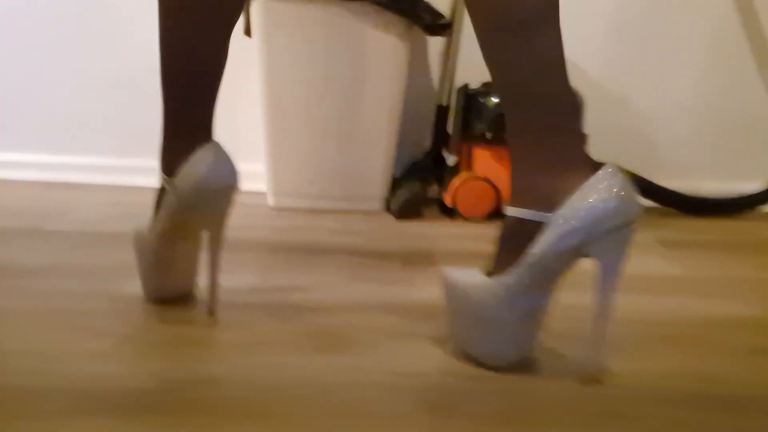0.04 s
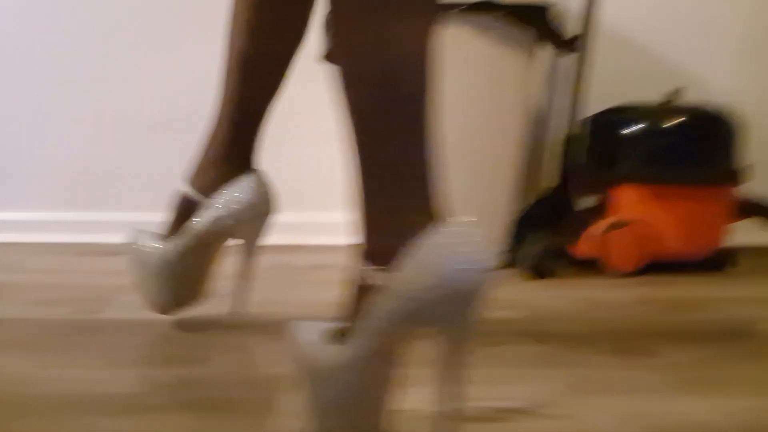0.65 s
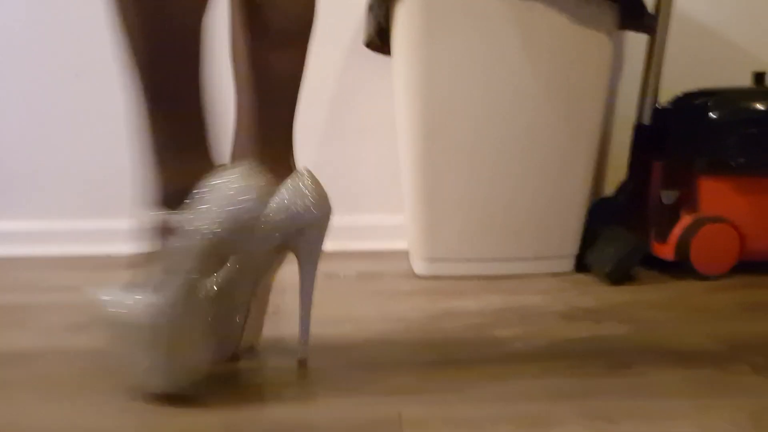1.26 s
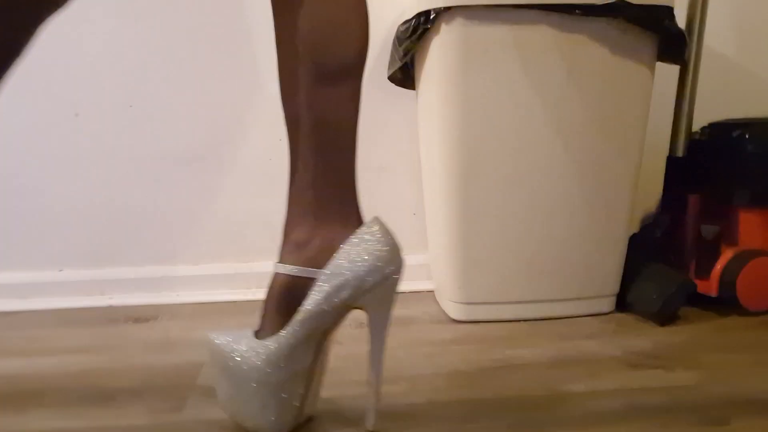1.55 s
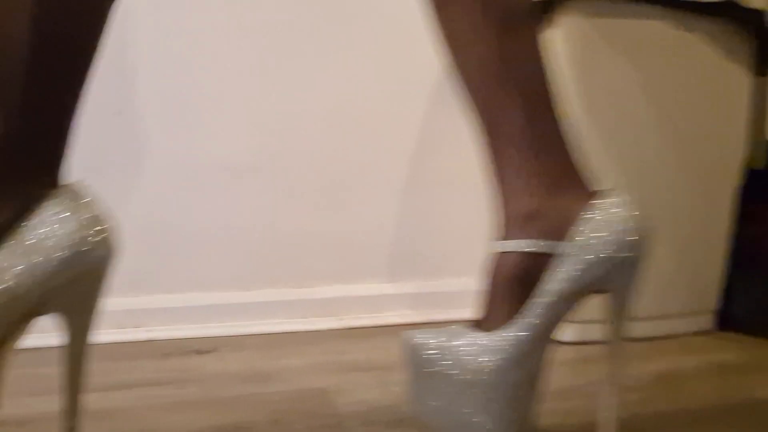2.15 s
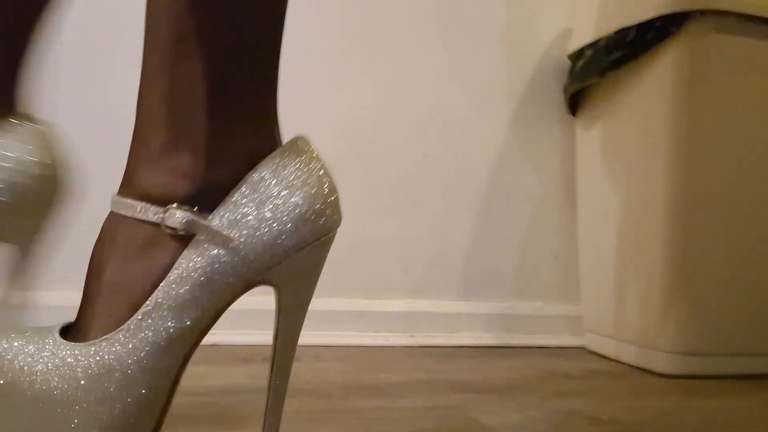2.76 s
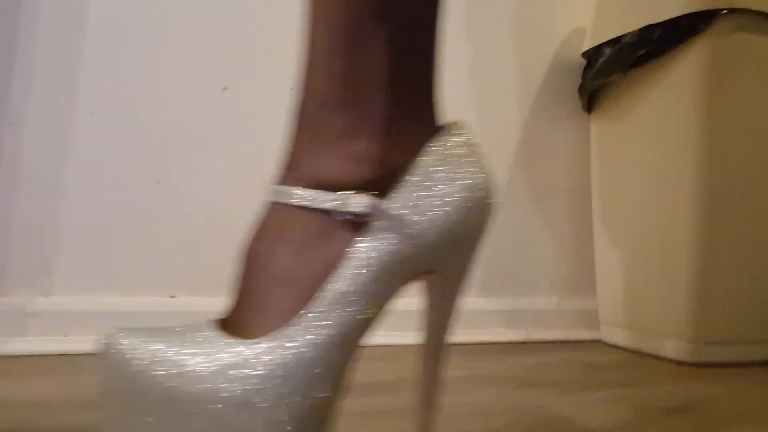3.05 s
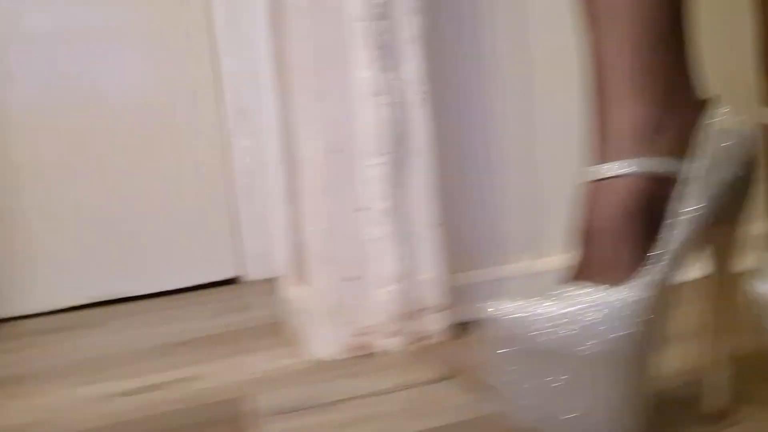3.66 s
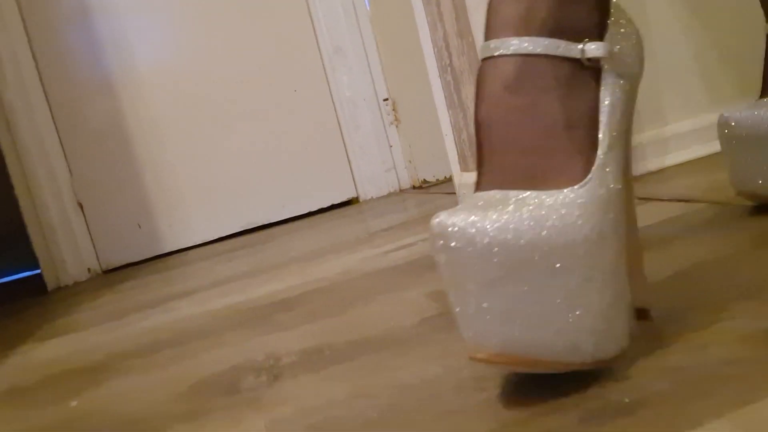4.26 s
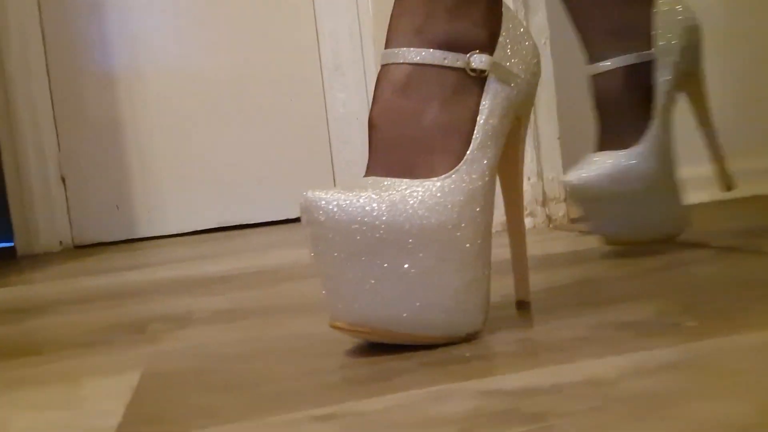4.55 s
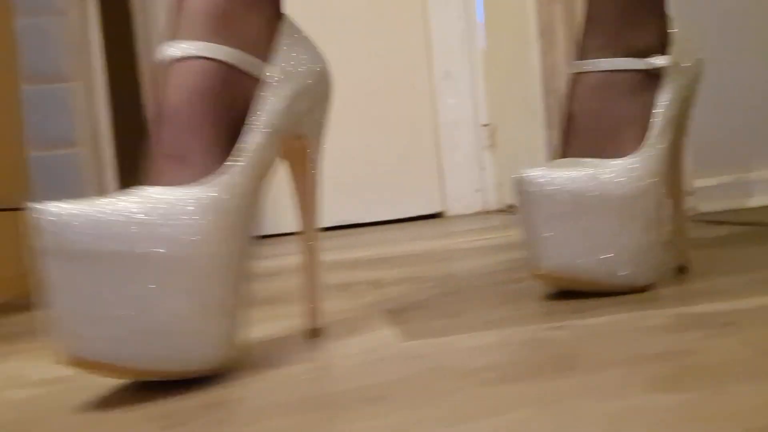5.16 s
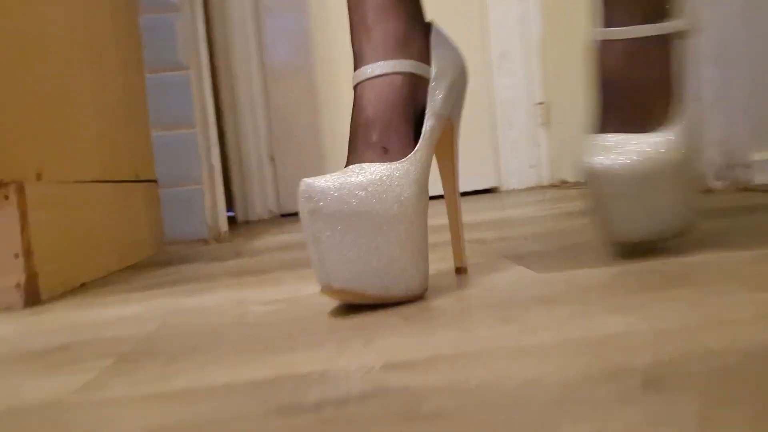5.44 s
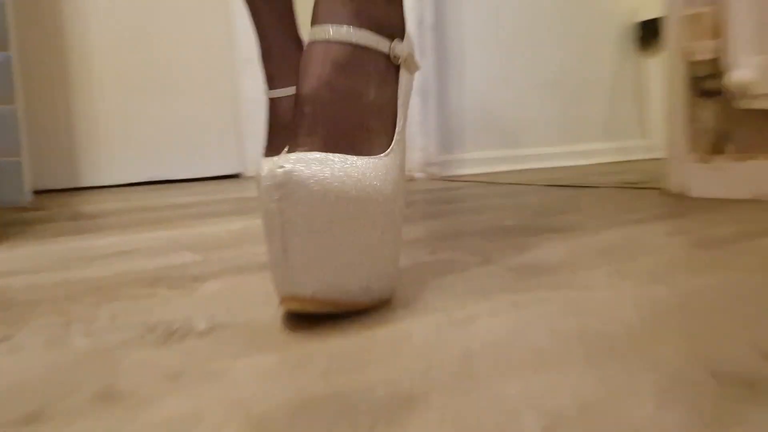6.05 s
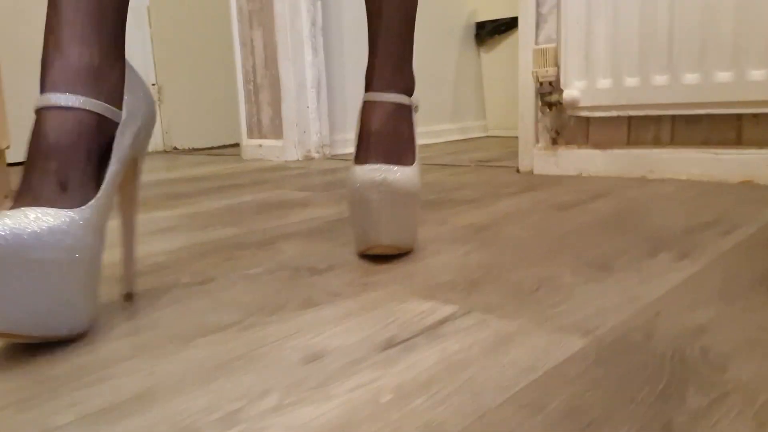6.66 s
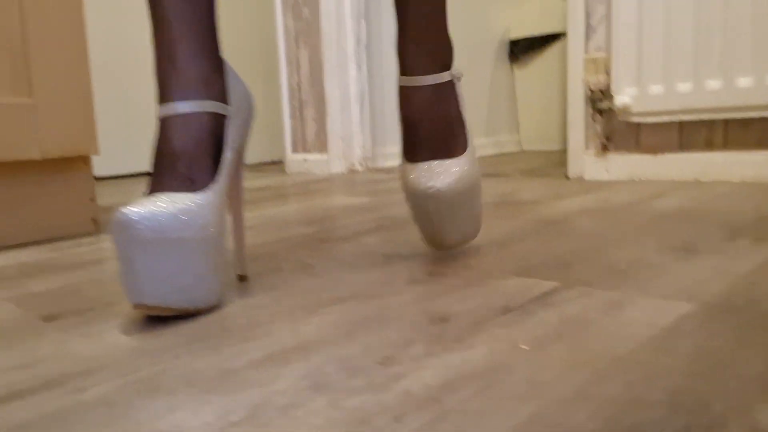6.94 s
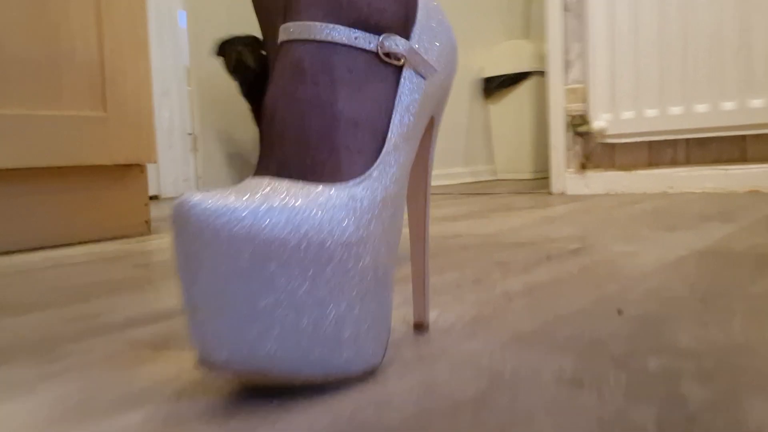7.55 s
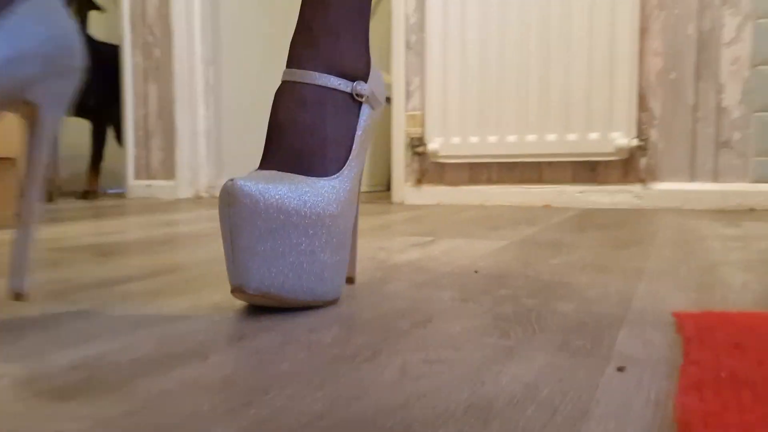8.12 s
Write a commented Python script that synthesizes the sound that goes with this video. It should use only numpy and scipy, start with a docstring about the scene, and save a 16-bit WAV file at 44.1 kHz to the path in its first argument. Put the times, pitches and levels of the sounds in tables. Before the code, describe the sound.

Slow steps in platform high heels clack and thud indoors, with soft scuffing and a sharp click as the shoes graze each other.

```python
"""A soft scuff and a sharp heel knock come first, over faint room air and the rumble of a low camera.
Glittery platform high heels go on stepping slowly over a laminate floor in a small room.
Heel tips and platforms knock on the planks and set the floor booming. Between steps, soles and
stockings scuff, straps squeak and buckles tap. Once the two glitter-coated shoes graze each other
with a sharp rasping click, and later a board creaks under a turning foot."""
import sys
import numpy as np
from scipy import signal
from scipy.fft import rfft, irfft
from scipy.io import wavfile
from scipy.ndimage import uniform_filter1d

SR = 44100
rng = np.random.default_rng(int(sys.argv[2]) if len(sys.argv) > 2 else 0)


def to_wav(s):
    """Save 16-bit WAV."""
    ch = np.atleast_2d(s).T  # columns
    pcm = np.round(np.clip(ch, -1, 1) * 32767)  # PCM
    wavfile.write(sys.argv[1], SR, pcm.astype(np.int16))


N = 365588


def amp(db):
    """Turns decibels into a number to multiply a sound by."""
    return 10 ** (np.asarray(db) / 20)


def read_curve(points, hz):
    """Joins a table's points with straight lines over log frequency and reads them at hz."""
    known_hz, values = np.transpose(points)
    return np.interp(np.log(hz + 1), np.log(known_hz), values)


def seconds(length):
    """The time of each sample, from zero to length."""
    return np.arange(int(length * SR)) / SR


def unit(x):
    """Scales a sound so that the energy of its channels averages one."""
    return x / np.sqrt(np.mean(np.sum(x ** 2, -1)) + 1e-20)


def add(mix, start, sound):
    """Lays a sound into the mix at a time in seconds."""
    part = mix[..., max(round(start * SR), 0):][..., :sound.shape[-1]]
    part += sound[..., :part.shape[-1]]


def colour(x, spectrum, size=2048):
    """Gives a sound the balance of lows and highs in a table, with no ringing ahead of it."""
    log_gain = np.log(amp(read_curve(spectrum, abs(np.fft.fftfreq(size, 1 / SR)))))
    response = np.exp(np.conj(signal.hilbert(log_gain)))
    kernel = unit(np.fft.ifft(response).real)
    return signal.oaconvolve(np.atleast_2d(x), kernel[None], axes=1)[:, :x.shape[-1]]


def ring(t, db, hz, t60, rise_cycles=0.38):
    """One struck note: it builds quickly, then fades by 60 dB in t60 seconds, its ring time."""
    return amp(db - 60 * t / t60) * np.sin(2 * np.pi * hz * t) * (1 - np.exp(-t * hz / rise_cycles))


def two_mics(x, delay):
    """One sound reaches two microphones, the right one later by delay seconds."""
    hz = np.fft.rfftfreq(len(x), 1 / SR)
    return irfft(rfft(x) * np.exp(1j * np.pi * hz * delay * np.array([[1], [-1]])), len(x))


def friction(strokes, spectrum, grains_per_s, spread_db):
    """Rubbing is many tiny slips. Each stroke is (time [s], swell [s], fade [s], level [dB])."""
    force = np.zeros(N)
    for start, swell, fade, db in strokes:
        t = seconds(swell + 7 * fade)
        add(force, start, amp(db) * np.minimum(t / swell, 1) * np.exp(-np.maximum(t - swell, 0) / fade))
    sizes = amp(spread_db * np.minimum(rng.exponential(1, N), 3)) * rng.choice([-1, 1], N)
    slips = unit(sizes * (rng.random(N) < grains_per_s / SR)) * np.sqrt(N)
    return colour(force * slips, spectrum)[0]


def by_chance(per_s, swell, fade, db, spread_db=11):
    """Rubbing strokes of uneven strength at random moments."""
    gaps, strengths = rng.random((128, 2)).T
    times = np.cumsum(.5 + gaps) / per_s
    levels = db + spread_db * (2 * strengths - 1)
    return [(start, swell, fade, level) for start, level in zip(times, levels) if start < N / SR]


# How long the room echoes: (frequency [Hz], ring time [s])
ROOM_RING = [(100, 0.65), (400, 0.53), (900, 0.61), (1800, 0.36), (3500, 0.4), (7000, 0.25), (14000, 0.2)]
# How alike the echo is on the left and right: (frequency [Hz], likeness [0 to 1])
ECHO_LIKENESS = [(60, 1), (250, 0.81), (500, 0.69), (1000, 0), (2000, 0), (16000, 0)]
def room(x, near_db=0.5, near_t60=0.16, gap_s=0.00092, size=24576):
    """Echoes from one spot: a quick cluster off floor and skirting, then the slower room."""
    t, hz = np.arange(size) / SR, np.fft.rfftfreq(size, 1 / SR)
    left, other = rfft(rng.standard_normal((2, size)) * (rng.random((2, size)) < .15))
    alike = read_curve(ECHO_LIKENESS, hz)
    pair = np.array([left, alike * left + np.sqrt(1 - alike ** 2) * other])
    centres, t60s = np.transpose(ROOM_RING)
    tail = 0
    for share, t60 in zip(np.eye(len(centres)), t60s):
        band = irfft(pair * read_curve(np.c_[centres, share], hz))
        tail = tail + band * (amp(-60 * t / t60) + amp(near_db - 60 * t / near_t60))
    return signal.fftconvolve(np.atleast_2d(x), unit(tail * (t > gap_s)), axes=1)


# The tone of the room air and of the camera's rumble: (frequency [Hz], level [dB])
AIR_TONE = [(12, -33.5), (20, -0.5), (74, -2.5), (168, -16.5), (367, -14), (446, -13), (802, -13.5),
            (1760, -20.5), (2140, -18), (4420, -29), (5530, -24.5), (8410, -31), (9670, -28.5),
            (16000, -39)]
RUMBLE_TONE = [(20, -6), (40, 1), (56, -2), (100, -3.5), (200, -14.5), (350, -7.5), (450, -24),
               (1200, -25.5), (3000, -47.5)]
# How the rumble rises and falls: (time [s], level [dB])
RUMBLE_LEVELS = [(0, -65.5), (.5, -72), (1.1, -62.5), (1.4, -77), (2, -75), (2.6, -70), (4.7, -63.5),
                 (5.7, -70), (7.3, -70.5), (8.29, -68)]
def air_and_rumble(air_db=-69, air_follow=0.65):
    """The carried camera rumbles, and the hush of the room air swells a little with it."""
    rumble_db = np.interp(np.arange(N) / SR, *np.transpose(RUMBLE_LEVELS))
    swell_db = air_follow * (rumble_db - rumble_db.mean())
    air = amp(air_db + swell_db) * colour(rng.standard_normal((3, N)), AIR_TONE, size=8192)
    rumble = amp(rumble_db + 0.5) * colour(rng.standard_normal((3, N)), RUMBLE_TONE, size=8192)
    # row 0 goes to both sides; the other two rows are left and right
    return 0.44 * air[0] + 0.94 * air[1:] + rumble[0] + 0.25 * rumble[1:]


# The tone of the high hiss and of the sole's low rub: (frequency [Hz], level [dB])
HISS_TONE = [(300, -33.5), (1500, -3), (3000, -2.5), (5600, 0.5), (7400, -1.5), (8400, -7), (9500, 0),
             (12000, -9.5), (16000, -11.5)]
RUB_TONE = [(150, -23), (500, -7), (900, 1.5), (1700, -0.5), (2600, -9), (5000, -24.5), (16000, -40.5)]
# A foot pushes off or brushes past the other leg: (time [s], swell [s], level [dB])
SLIDES = [(0, 0.024, -53), (0.258, 0.0067, -59.5), (0.532, 0.018, -57.5), (1.514, 0.0043, -69.5),
          (1.943, 0.0035, -65.5), (2.409, 0.005, -60), (2.7, 0.012, -70), (3.48, 0.017, -74),
          (3.95, 0.0077, -60), (4.2, .09, -67.5), (4.502, 0.033, -59), (4.704, .023, -63.5),
          (5.05, 0.01, -67), (5.34, 0.042, -60.5), (6.224, 0.0024, -48), (6.878, .01, -63.5),
          (7.135, 0.068, -55), (7.44, 0.036, -59), (7.499, 0.0035, -47.5), (7.756, 0.018, -66.5),
          (7.889, 0.0013, -50.5)]
def scuffs(halving_db=11, weight_follow=0.64):
    """Sliding stockings and soles hiss, and the sole also rubs lower down."""
    # a faster slide is louder and shorter
    slides = [(start, swell, 0.051 * .5 ** ((db + 57) / halving_db), db) for start, swell, db in SLIDES]
    # after each heel (listed below) the shoe grinds as it takes the weight, louder for a heavy step
    grinds = [(start + 0.015, 0.052, 0.11, -64.5 + weight_follow * (boom_db + 10))
              for start, *_, boom_db, hollow_hz, room_db, side in HEEL_STRIKES]
    stockings = by_chance(per_s=6, swell=0.049, fade=0.035, db=-77)
    rubs = [(*timing, db - 5.5) for *timing, db in slides]
    rubs += [(*timing, db + 7.5) for *timing, db in grinds]  # more low rub under load
    hiss = friction(slides + grinds + stockings, HISS_TONE, grains_per_s=3500, spread_db=9)
    return hiss + friction(rubs, RUB_TONE, grains_per_s=1600, spread_db=-0.5)


# The tone of grit under the tip: (frequency [Hz], level [dB])
GRIT_TONE = [(60, -29), (1000, -3), (2200, 5), (4000, 7), (8000, -1), (15000, -8.5)]
# The notes of the slim heel and its tip: (pitch [Hz], level [dB], ring time [s])
HEEL_NOTES = [(1736, -38.5, 0.028), (2177, -22.5, 0.035), (2670, -13, 0.0047), (3930, -25.5, 0.018),
              (6670, -21, 0.014), (7680, -26.5, 0.012), (9760, -28, 0.0052)]
def tick(t, fade_s=0.0022):
    """The hard tip meets grit: a brief crackle, and the heel rings."""
    crackle = unit(rng.standard_normal(len(t)) * np.exp(-t / fade_s))
    detune = 1 + 0.005 * rng.standard_normal(len(HEEL_NOTES))
    ringing = sum(ring(t, db - 2.5, hz * k, t60) for k, (hz, db, t60) in zip(detune, HEEL_NOTES))
    return unit(unit(colour(crackle, GRIT_TONE)[0]) + ringing)


# The deep notes of the whole floor: (pitch [Hz], level [dB], ring time [s])
FLOOR_NOTES = [(55, -5, 0.23), (76.5, 3, 0.43), (94.5, -11.5, 0.13), (100, -5.5, 0.66), (129.2, 1.5, 0.1),
               (153.2, -1.5, 0.39), (201.8, 0, 0.46), (233.6, -3.5, 0.37), (306, 1, 0.32)]
def floor_boom(rise_s=0.0068, side_spread=0.47):
    """The floor's notes blend differently at each spot trodden on, and at each microphone."""
    t, count = seconds(.6), len(FLOOR_NOTES)
    weights = rng.choice([-1, 1], count) * rng.uniform(.5, 1.5, count)
    detune = 1 + 0.044 * rng.standard_normal(count)
    notes = np.array([ring(t, db, hz * k, t60) for k, (hz, db, t60) in zip(detune, FLOOR_NOTES)])
    side_weights = weights * (1 + side_spread * rng.standard_normal((2, count)))
    return unit(side_weights @ notes * (1 - np.exp(-t / rise_s)))


def knock(out, start, plank_db, plank_hz, cycles, clack_db, clack_hz, thud_db, thud_hz,
          tick_db, boom_db, hollow_hz, room_db, side):
    """Adds one blow to out: plank and shoe ring briefly, the room echoes and the floor booms."""
    t = seconds(.3)
    plank = ring(t, plank_db, plank_hz, cycles / plank_hz)
    clack = ring(t, clack_db, clack_hz, 4.86 / clack_hz)
    thud = ring(t, thud_db, thud_hz, 2.9 / thud_hz)
    heel_ring = ring(t, plank_db - 25.5, hz=2080, t60=0.015)  # the heel's brief high ring on each blow
    soften = signal.butter(2, 3000, fs=SR, output="sos")  # contact takes time, which dulls the highs
    blow = signal.sosfilt(soften, plank + clack + thud + heel_ring) + amp(tick_db - 4) * tick(t)
    # a loose board holds one hollow note, louder the more the floor is shaken
    hollow = ring(t, -29 + 0.69 * boom_db, hollow_hz, t60=.2, rise_cycles=0.9)
    plank_tail = ring(t, plank_db - 21.5, plank_hz, t60=0.024, rise_cycles=4.5)
    lead = 64  # silent samples, so the nearer microphone can hear the blow early
    direct = np.pad(blow + hollow + plank_tail, (lead, 0))
    delay_s = side * 0.00023
    add(out, start - lead / SR, two_mics(direct, delay_s))
    wall_s = rng.uniform(.004, .011)  # the nearest wall answers from the other side
    add(out, start - lead / SR + wall_s, amp(-12.5) * two_mics(direct, -delay_s))
    add(out, start, amp(room_db + 1.78) * room(blow, near_db=11, near_t60=0.17))
    add(out, start, amp(boom_db + 4) * floor_boom())


# Each heel landing: (time [s], plank level [dB], plank pitch [Hz], plank ring [cycles],
# shoe clack level [dB], clack pitch [Hz], thud level [dB], thud pitch [Hz], tick level [dB],
# floor boom level [dB], hollow note [Hz], echo level [dB], side [-1 right to 1 left])
HEEL_STRIKES = [(0.0788, -23, 367, 9.2, -6.5, 1550, -16.5, 192, -25.5, -12.5, 190, -3.5, 0.22),
                (0.8174, -18.5, 370, 3.1, -15.5, 1420, -37, 190, -21, -15, 695, -0.5, 0.27),
                (2.1475, -14.5, 747, 4.5, -15.5, 1240, -31, 218, -30, -17, 992, -2, 0.68),
                (3.2659, -15.5, 582, 7.7, -15.5, 1390, -40, 170, -28, -20.5, 524, -5, 0.91),
                (4.305, 1, 724, 2.4, -17.5, 1000, -26, 240, -20.5, -16.5, 955, -7.5, -1.04),
                (5.2192, -7.5, 554, 4.75, -11, 952, -24.5, 187, -24, -14, 397, -6.5, -0.077),
                (5.889, -31.5, 1030, 5.6, -36, 1320, -51.5, 187, -53, -33, 1040, -2.5, -0.41),
                (5.9639, -15.5, 798, 10, -6, 890, -15, 235.6, -10, -14.5, 310.7, -8.5, -0.36),
                (6.767, -12, 495, 2.8, -7, 1120, -26.5, 129, -23.5, -17, 615, -3, 0.48),
                (7.559, -3.5, 782, 4.14, -5.5, 1350, -12.5, 172, -39, -15.5, 197, -5, -0.37),
                (8.0468, -10, 626, 2.66, -14, 1000, -53, 240, -23, -15.5, 570, 4, 0.72)]
def heels():
    """Each heel lands on a new board, so each knock has its own pitch."""
    out = np.zeros((2, N))
    for strike in HEEL_STRIKES:
        knock(out, *strike)
    return out


# The tone of the shuddering floor: (frequency [Hz], level [dB])
SHUDDER_TONE = [(40, -6), (110, -4), (210, -2), (480, -11), (750, -11), (1200, -17.5), (2200, -24.5),
                (8000, -54.5)]
# The walker's weight shifts: (time [s], fade [s], level [dB])
WEIGHT_SHIFTS = [(.136, 0.0046, -37), (0.184, 0.016, -50.5), (2.935, .013, -65), (3.056, 0.01, -63),
                 (3.189, 0.0077, -56), (3.965, 0.033, -54.5), (6.222, 0.037, -41), (6.9, 0.024, -54),
                 (7.861, 0.017, -53.5)]
def floor_shudders(swell_s=0.0014):
    """Shifting weight makes the floor thump and shudder, with smaller shifts at chance moments."""
    shifts = [(start, swell_s, fade, db) for start, fade, db in WEIGHT_SHIFTS]
    shifts += by_chance(per_s=4, swell=swell_s, fade=0.0069, db=-73.5)
    return friction(shifts, SHUDDER_TONE, grains_per_s=2000, spread_db=-2)


# The tone of a strap: (frequency [Hz], level [dB])
STRAP_TONE = [(1000, -39), (4000, -17), (4900, -20), (5300, -8), (5800, -19), (6600, -19), (16000, -40)]
# Each squeak of a strap: (time [s], level [dB])
STRAP_SQUEAKS = [(.205, -58), (0.889, -54.5), (1.119, -69), (7.478, -58)]
def strap_squeaks(swell_s=0.0068, fade_s=0.034):
    """The straps slip in tiny jerks, making faint, gritty squeaks."""
    strokes = [(start, swell_s, fade_s, db) for start, db in STRAP_SQUEAKS]
    return friction(strokes, STRAP_TONE, grains_per_s=620, spread_db=0)


# Each platform landing or rocking: (time [s], plank level [dB], plank pitch [Hz], plank ring [cycles],
# shoe clack level [dB], thud level [dB], tick level [dB])
PLATFORM_STRIKES = [(0.8988, -24, 526, 4.3, -52, -26, -26.5), (0.9603, -35.5, 650, 8.4, -27, -35.5, -25.5),
                    (2.2662, -25, 475, 2, -29.5, -36.5, -34), (2.3173, -28.5, 422, 1.7, -32.5, -48, -36.5),
                    (3.022, -43, 705, 3.5, -63, -46, -55), (3.4385, -46, 670, 6.6, -32.5, -38.5, -35.5),
                    (3.95, -48, 520, 3.5, -36, -35.5, -56), (4.42, -30.5, 670, 4.1, -18.5, -36, -16),
                    (4.4962, -36, 870, 10, -27, -40, -18), (5.2875, -17.5, 545, 7.7, -26, -31, -20),
                    (6.0582, -3.5, 508, 2.2, -15.5, -30, -13.5), (6.7821, -6, 467, 1.95, -30.5, -22.5, -21),
                    (7.62, -26, 537, 4.8, -20.5, -13.5, -9.5)]
def platforms(clack_hz=1100, thud_hz=178):
    """The broad platform knocks on the board that its heel just struck, sharing its hollow note."""
    out = np.zeros((2, N))
    for start, plank_db, plank_hz, cycles, clack_db, thud_db, tick_db in PLATFORM_STRIKES:
        *_, hollow_hz, room_db, side = [heel for heel in HEEL_STRIKES if heel[0] < start][-1]
        boom_db = max(plank_db, thud_db) - 10
        knock(out, start, plank_db, plank_hz, cycles, clack_db, clack_hz, thud_db, thud_hz,
              tick_db, boom_db, hollow_hz, room_db, side)
    return out


# The tone of a tap: (frequency [Hz], level [dB])
TAP_TONE = [(300, -27), (2000, -7), (5000, -3), (8000, -2), (11000, -5), (16000, -2)]
# Each light touch of a heel tip or buckle: (time [s], level [dB])
LIGHT_TAPS = [(1.044, -39), (1.706, -40.5), (2.217, -32), (3.416, -33.5), (3.604, -38), (5.497, -29.5),
              (7.503, -24.5), (7.893, -45)]
def taps(fade_s=0.0014):
    """Heel tips and buckles tick brightly, too lightly to move the floor."""
    out, t = np.zeros(N), seconds(.03)
    for start, db in LIGHT_TAPS:
        snap = rng.standard_normal(len(t)) * np.exp(-t / fade_s)
        add(out, start, amp(db - 0.5) * unit(colour(snap, TAP_TONE))[0])
    return out + amp(-4) * room(out)[:, :N]


# The tone of scraped glitter: (frequency [Hz], level [dB])
GLITTER_TONE = [(150, -66.5), (600, -27), (2000, -20.5), (3200, -15.5), (4500, -15.5), (6000, -8),
                (7500, -8.5), (8500, -11), (10400, 0), (12900, -2.5), (16000, -8)]
# Glitter catches on glitter: (time [s], swell [s], fade [s], level [dB])
GLITTER_CATCHES = [(3.799, 0.0005, 0.003, -18.5), (3.8035, 0.0027, 0.0018, -8),
                   (3.811, 0.0052, 0.0027, -14.5), (3.8152, 0.0011, 0.0014, -18)]
def shoe_graze(echo_db=-2.5, left_db=-4.5, right_db=-1.5):
    """One shoe grazes the other just to the right, catching at one spot after another."""
    out = np.zeros((2, N))
    for start, *stroke in GLITTER_CATCHES:
        rasp = friction([(0, *stroke)], GLITTER_TONE, grains_per_s=26000, spread_db=1)[:SR // 8]
        add(out, start, two_mics(rasp, delay=-0.00029) * amp([[left_db], [right_db]]))
        add(out, start, amp(echo_db) * room(rasp, near_db=6, near_t60=0.062))
    return out


# The path of the creaking board's note: (time [s], pitch [Hz], level [dB])
CREAK_PATH = [(6.23, 607, -54), (6.298, 564, -52), (6.371, 488, -65.5), (6.46, 429, -64.5),
              (6.56, 416, -66)]
def board_creak(waver=0.1):
    """A board's note sinks and wavers as the foot turns on it."""
    times, hz, db = np.transpose(CREAK_PATH)
    t = np.arange(times[0], times[-1], 1 / SR)
    wobble = unit(uniform_filter1d(rng.standard_normal(len(t)), size=120)) * np.sqrt(len(t))
    cycles = np.cumsum(np.interp(t, times, hz) * (1 + waver * wobble)) / SR
    loudness = amp(np.interp(t, times, db)) * signal.windows.tukey(len(t), .1)
    out = np.zeros(N)
    add(out, times[0], loudness * np.sin(2 * np.pi * cycles))
    return out


def scene():
    """Adds up the steps, the rubbing sounds with their echo, and the background."""
    steps = heels() + platforms() + taps()
    rubbing = scuffs() + floor_shudders() + strap_squeaks()
    rubbing_in_room = amp(-9) * rubbing + room(rubbing, near_db=10)[:, :N]
    return steps + rubbing_in_room + board_creak() + shoe_graze() + air_and_rumble()


def record(dry, right_db=1.5, low_cut_hz=42, high_cut_hz=16200, ceiling=0.7):
    """Two microphones, the right a bit louder, trim the deepest bass, loud peaks and highest treble."""
    low_cut = signal.butter(2, low_cut_hz, "high", fs=SR, output="sos")
    trimmed = signal.sosfilt(low_cut, dry * amp([[0], [right_db]]))
    rounded = ceiling * np.tanh(trimmed / ceiling)
    high_cut = signal.firwin(511, high_cut_hz, window=("kaiser", 9), fs=SR)
    return signal.oaconvolve(rounded, high_cut[None], "same")


dry = scene()
out = record(dry)
to_wav(out)
```